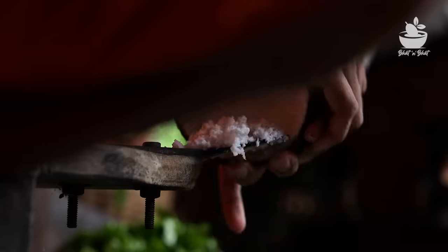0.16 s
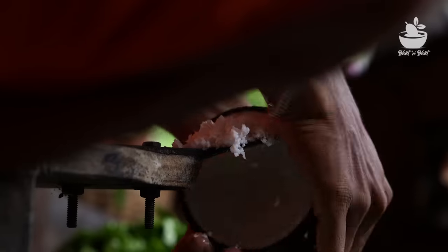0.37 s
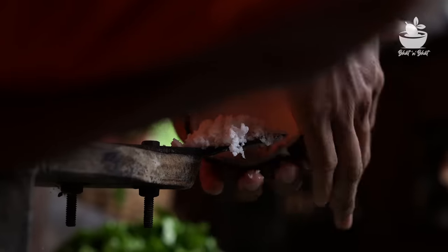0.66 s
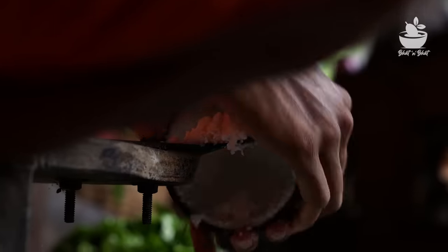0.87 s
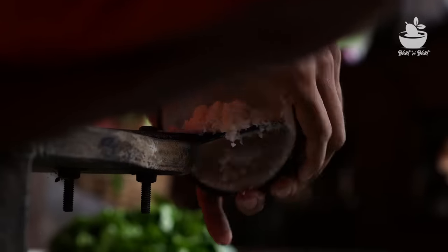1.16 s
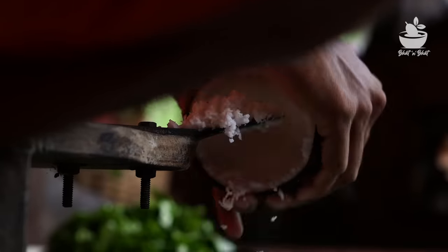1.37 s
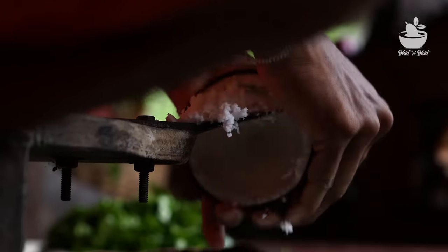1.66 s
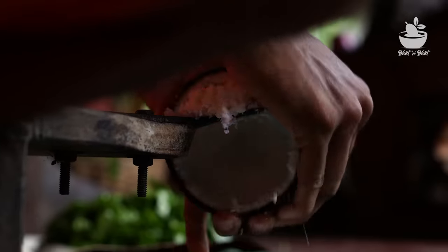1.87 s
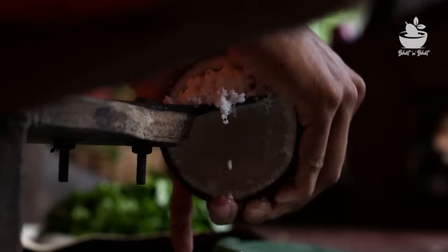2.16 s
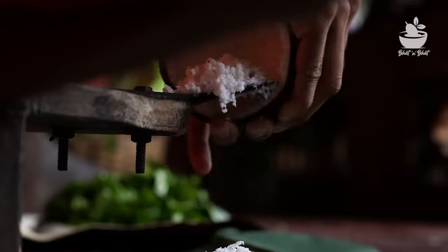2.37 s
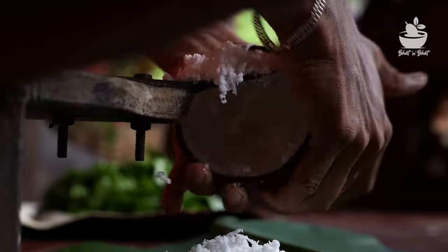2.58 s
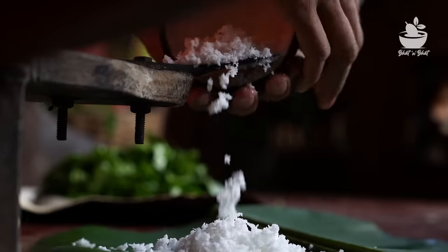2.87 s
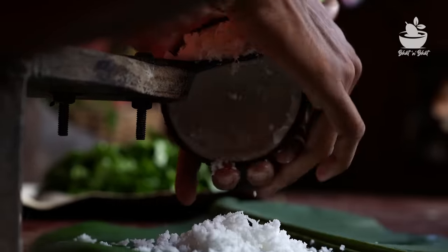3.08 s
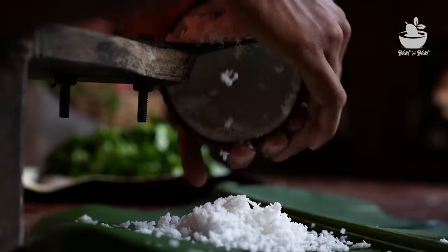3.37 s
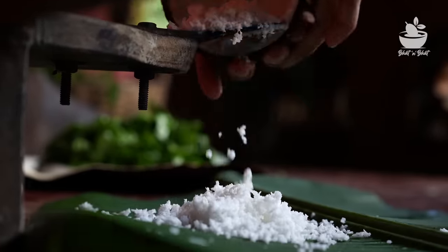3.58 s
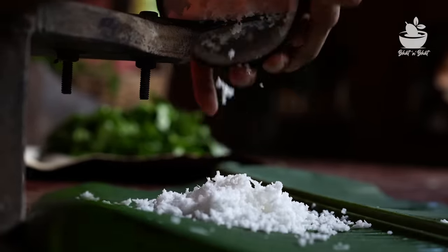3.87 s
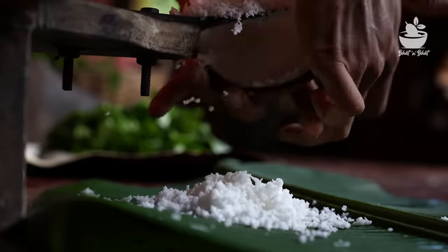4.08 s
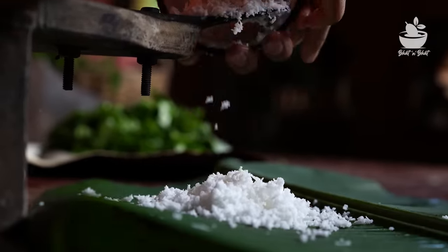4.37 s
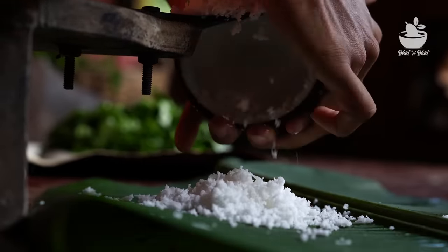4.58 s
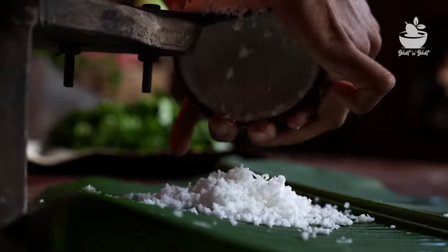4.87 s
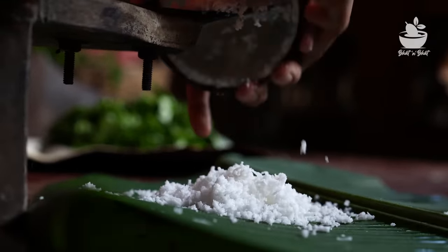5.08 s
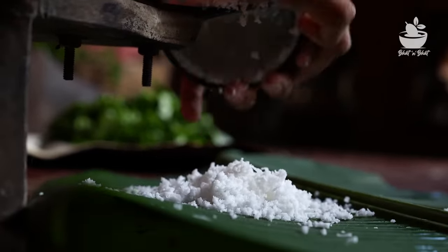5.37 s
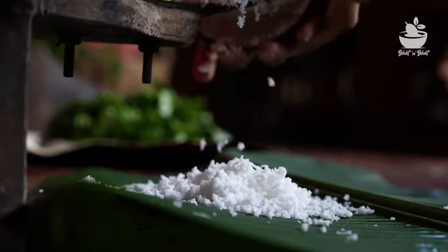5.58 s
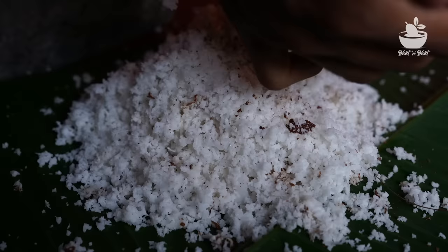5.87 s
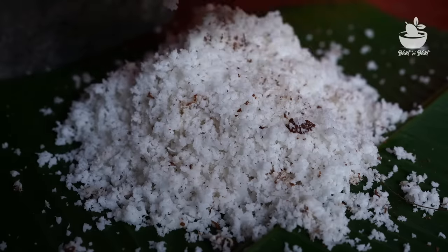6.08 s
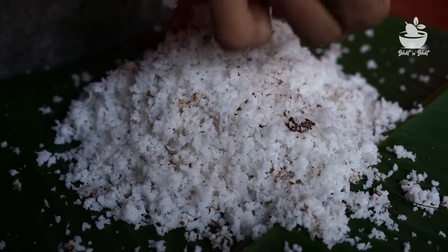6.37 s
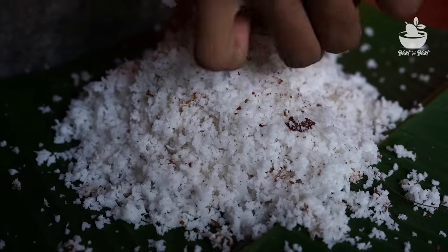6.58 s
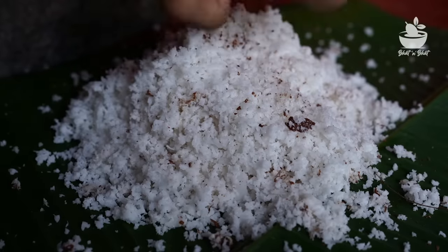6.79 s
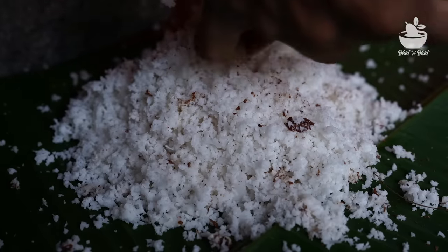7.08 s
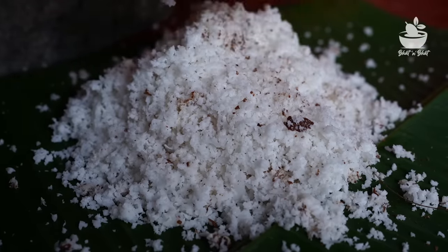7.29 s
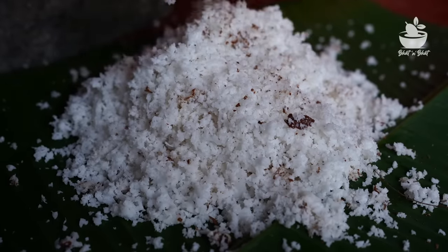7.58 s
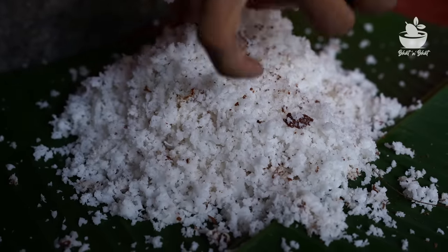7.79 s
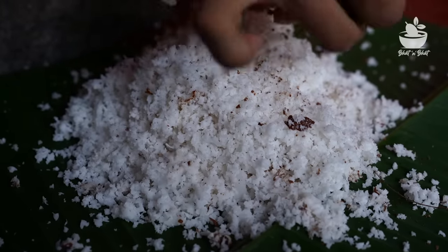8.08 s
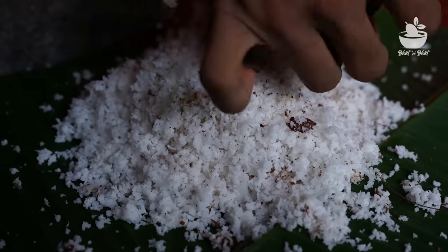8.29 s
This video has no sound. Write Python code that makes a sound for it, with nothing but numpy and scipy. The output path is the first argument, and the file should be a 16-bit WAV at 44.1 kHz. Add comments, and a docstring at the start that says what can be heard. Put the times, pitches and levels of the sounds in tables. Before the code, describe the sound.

A close, dry-sounding kitchen scene with a short room tail, faint hiss, gently swelling rumble, a low drone and a barely audible high whine. From 0 s a halved coconut is scraped over a toothed metal blade, roughly three strokes a second, each about a tenth of a second long: a hollow low boom, a dull blade ring and a grainy fibrous rasp. Small thumps and clacks fall between strokes as the shell is set back, strongest near 0.5 s and 3.9 s. Short pauses come around 0.6, 2.8 and 4.2 s, the latter two with very faint rubbing. A brief blade judder sounds at 4.5 s. From 5.9 s the drone fades and the scraping turns thinner, crisper and more metallic, with stuttering judders, clearest at 6.2 and 6.8 s. A light wooden tock comes at 7.1 s, then four more strokes and a firmer knock near 8.2 s before the end at 8.4 s.

```python
"""A coconut half is pushed over the toothed blade of a bench scraper, about three strokes a second, heard close by.
Stick and slip at the teeth excites three bodies: the hollow shell booms, the blade rings and the torn fibres rasp.
Between strokes the shell is set back on the blade with a small knock; the blade judders at times, and one wooden
tock sounds. From 5.9 s the scraping sounds thinner and crisper. Behind it lie a short room tail, faint hiss and
rumble, a low drone and a thin whine."""
import sys
import numpy as np
from scipy import signal
from scipy.fft import rfft, irfft, next_fast_len
from scipy.io import wavfile
from scipy.ndimage import uniform_filter1d, minimum_filter1d, map_coordinates

SR = 44100
rng = np.random.default_rng(int(sys.argv[2]) if len(sys.argv) > 2 else 0)


def log_audio(samples):
    """Write samples as a 16-bit WAV file to the path given in sys.argv[1]."""
    # one column per channel
    frames = np.atleast_2d(samples).T
    # limit to full scale, then quantise
    limited = np.clip(frames, -1, 1)
    pcm = np.round(limited * 32767).astype(np.int16)
    wavfile.write(sys.argv[1], SR, pcm)


N = 371971  # length [samples]

# Spectrum of the quiet kitchen, relative: (frequency [Hz], density [dB per Hz])
QUIET = [(20, 0.5), (45, -8.5), (70, -7.5), (150, -14), (220, -8), (400, -10.5), (720, -19.5), (1000, -24),
         (1400, -29), (2400, -34.5), (3000, -37), (5000, -40.5), (7000, -45), (15800, -52)]
QUIET_DB = -42  # rms level before the swell and the hush
# Gain of the background above the deepest rumble: (time [s], gain [dB])
HUSH = [(0, -0.5), (5.88, 0), (5.93, -3), (6.1, 0.5), (6.3, 0), (8.43, 0.5)]
HUSH_ABOVE_HZ = 45  # corner below which the hush fades out
# Faint steady notes: (time [s], drone near 105 Hz [dB], mean whine near 10 kHz [dB])
HUMS = [(0, -49, -86), (5.8, -50.5, -82), (5.95, -64, -75), (8.43, -74, -77)]
# Decay of the room: (frequency [Hz], time to fall 60 dB [s])
ROOM_DECAY = [(150, 1), (370, 0.5), (800, 0.39), (2500, 0.35), (12000, 0.2)]
ROOM_DB = (-22.5, -18)  # room against direct sound, in the fuller and the thinner timbre

# The teeth slip in step with the blade's low note:
# (time [s], level before the shared gain [dB], nominal frequency [Hz])
JUDDERS = [(4.486, -10.5, 663), (5.697, -16, 595), (6.223, -2.5, 614), (6.548, -9.5, 661), (6.823, -6, 636),
           (7.663, -14, 670), (7.957, -19, 659)]
JUDDER_DB, JUDDER_S = -6.5, 0.013  # shared gain; time from the middle to 1/e

# The shell meets the blade between strokes; levels precede the gains in knocks():
# (time [s], thump [dB], clack [dB], crunch [dB])
TAPS = [(0.207, -14.5, -36, -44), (0.546, -7, -20.5, -39.5), (0.723, -21, -37, -50),
        (1.124, -21, -35, -41.5), (1.463, -19.5, -35, -47), (1.779, -20, -30.5, -44.5),
        (2.103, -20, -38, -52), (2.395, -18, -31, -43.5), (2.703, -14.5, -29.5, -39),
        (3.207, -44, -50, -48), (3.289, -20, -33, -43), (3.601, -23.5, -41, -53), (3.866, -10, -24, -36.5),
        (4.143, -36, -46, -43), (4.745, -25, -34.5, -46), (5.032, -22.5, -28.5, -40),
        (5.328, -16.5, -31, -42), (5.596, -29, -44, -43), (5.89, -22, -36, -46.5), (6.076, -34, -52, -60),
        (6.128, -25.5, -26.5, -41.5), (6.446, -25.5, -31.5, -42), (6.731, -24, -30, -36),
        (7.258, -34, -39, -47), (7.605, -23.5, -31, -41.5), (7.895, -27, -37, -43),
        (8.166, -15, -19.5, -42)]
CONTACT_S, CONTACT_HALVES_DB = 0.00047, 13  # contact at a 0 dB thump; this much harder halves it
# Spectrum of crushed flakes, relative: (frequency [Hz], density [dB per Hz])
FLAKES = [(1000, -14), (1700, 0), (2500, 0.5), (3600, -21), (4500, -2), (5200, 0), (6200, -21), (8500, -9),
          (16000, -32)]

# One row a stroke; peaks precede the gains of PUSH, BITE and RASP, the sag precedes their shares:
# (start [s], length [s], attack [s], push on the shell [dB], bite of the blade [dB],
#  rasp of the fibres [dB], sag by the end [dB])
STROKES = [(-0.059, 0.1, 0.008, -9, -21, -35, 12), (0.226, 0.12, 0.045, -14, -25.5, -39, 3),
           (0.825, 0.14, 0.016, -15.5, -28.5, -41.5, 2.5), (1.155, 0.13, 0.024, -12.5, -27, -40, 3),
           (1.481, 0.14, 0.021, -14.5, -27, -40.5, 6), (1.802, 0.13, 0.025, -14, -25.5, -40.5, 3.5),
           (2.124, 0.12, 0.029, -14, -25.3, -38.5, 7.5), (2.417, 0.11, 0.032, -13.5, -25, -38, 6.5),
           (2.972, 0.14, 0.045, -14, -24, -38, 8), (3.315, 0.11, 0.036, -16.5, -27, -39, 1),
           (3.618, 0.1, 0.033, -10.5, -25.3, -36, 9.5), (3.901, 0.099, 0.019, -13.0, -23.5, -35.5, 7.5),
           (4.44, 0.17, 0.022, -13.0, -25.5, -38.5, 20.5), (4.759, 0.12, 0.027, -14.5, -25.5, -38, 8.5),
           (5.063, 0.08, 0.029, -16.5, -25, -36.5, -3.5), (5.358, 0.095, 0.019, -17, -27, -37.5, 0.0),
           (5.634, 0.11, 0.054, -10, -24.5, -36.5, 11), (6.178, 0.12, 0.056, -10, -16.5, -36, 12),
           (6.482, 0.069, 0.037, -16.5, -23.5, -40, -1.5), (6.786, 0.092, 0.01, -19.5, -22, -40.5, 2.5),
           (7.324, 0.11, 0.046, -16, -22, -37.0, 2), (7.634, 0.08, 0.033, -19.5, -21, -35.5, -1),
           (7.918, 0.1, 0.022, -20, -23.5, -35, 5.5), (8.198, 0.097, 0.011, -12, -16, -33.5, 15.5)]
# How each force follows a stroke: (gain [dB], power of the rise, share of the sag, release [dB per s])
PUSH, BITE, RASP = (2.95, 0.98, 1.08, 305), (1.17, 0.88, 0.85, 340), (0.82, 0.87, 0.68, 290)
SAG_POWER = 1.56  # over 1: pressure changes slowly at first, then faster
GRAB = (0.14, 0.082, 0)  # share of the attack before push, bite and rasp set in: fibres graze first
# The teeth dig in (+) or skid (-) for a moment:
# (time [s], extra push [dB], extra bite [dB], extra rasp [dB])
SNAGS = [(.331, -1.5, 6.5, 4), (.878, 4.5, 0, 2.5), (1.176, 2.5, -2, 1.5), (1.836, 5, -0.5, -0.5),
         (1.912, -7, 3, 1), (2.997, 4, -5, 1), (3.049, 2, 2, -1), (3.354, 4.5, 4, -3), (4.487, 3, 4, -3),
         (4.783, 3, 2.5, -6), (5.156, 2, 4, 5.5), (5.416, 0, 5, 6.5), (5.7, -2.5, 6, 8), (6.268, 3, 4, 2),
         (6.506, -4, 9, 4), (6.55, 1.5, 7.5, 4), (6.81, -3, 9, 5), (6.85, -3, -3, -5), (6.878, 4, 2, 0),
         (7.367, 5, 10, 2.5), (7.663, -3, 11.5, 7.5), (7.955, 8, 12.5, 4.5)]
SNAG_S = 0.0079  # time from the middle of a snag to 1/e of its extra dB
# Fingers and shell rub lightly on the blade while the hand pauses:
# (middle [s], time from the middle to 1/e [s], level [dB])
RUBS = [(2.85, 0.19, -66), (4.388, .05, -60)]

THINNER_S = 5.92  # the thinner timbre begins; the next four tables hold a list for the fuller, then the thinner
# Resonances of the hollow shell: (frequency [Hz], width [Hz], relative level [dB])
SHELL = [
    [(248.6, 46.6, -4), (367.2, 42.7, 2.5), (470, 72, -3.5)],
    [(217, 25, -11), (352.6, 38, -0.5), (397.5, 19.5, 1), (520, 90, -42)],
]
# Resonances of the blade: (frequency [Hz], width [Hz], relative level [dB])
BLADE = [
    [(589, 85, 0.5), (658, 74, -2.5), (886, 130, -10), (974, 69, -5), (1155, 90, -12.5), (1309, 68, -8),
     (1560, 32, -10.5)],
    [(649, 44, 5.5), (698, 68, 1), (800, 110, -9), (882, 104, -7), (1154, 76, -9), (1260, 200, -13.5),
     (1427, 88, -10.5)],
]
# Lifts and notches that the steel makes in the treble: (frequency [Hz], width [Hz], gain [dB])
STEEL = [
    [(1730, 220, -7), (2096, 410, 9), (2382, 97, 7), (2720, 150, -3.5), (2960, 52, 8.5), (3240, 98, -2.5),
     (3324, 99, 7), (4120, 230, 4), (5180, 200, 2)],
    [(1710, 114, -9), (2053, 290, 10.5), (2290, 135, 6), (2560, 130, 3.5), (2870, 400, 5.5),
     (3320, 54, 1.5), (4400, 230, 2.5), (5300, 170, 7), (8100, 350, 0)],
]
# Spectrum of tearing fibres, relative: (frequency [Hz], density [dB per Hz])
FIBRES = [
    [(900, -3), (1600, -11.5), (2400, -0.5), (3300, -6.5), (5500, -11), (7000, -19.5), (10000, -20),
     (13000, -29.5), (16000, -25)],
    [(900, -23), (1600, -3.5), (2400, -3), (3500, -6), (5500, -10), (7000, -15), (8500, -13.5),
     (12000, -20.5), (16000, -27)],
]
# Lift of the finest crackle: (time [s], gain [dB])
CRISP = [(0, 1.5), (1.6, 2), (3.2, 3), (5.7, 2), (6.2, 4), (8.3, 1)]

TOP_HZ = 15830  # band limit


def amp(db):
    """Level: amplitude grows tenfold every 20 dB."""
    return 10 ** (np.asarray(db) / 20)


def unit(x):
    """Normalisation: the rms becomes 1."""
    return x / np.sqrt(np.mean(np.abs(x) ** 2) + 1e-20)


def along(points, hz):
    """Interpolation on a logarithmic frequency axis through (frequency [Hz], value) points."""
    frequency, value = np.transpose(points)
    return np.interp(np.log(hz + 1), np.log(frequency + 1), value)


def over_time(points):
    """Linear interpolation through (time [s], value) points, one value a sample."""
    return np.interp(np.arange(N) / SR, *np.transpose(points))


def wobble(rate):
    """Slow fluctuation: a smooth curve through random knots, rate of them a second."""
    knots = rng.standard_normal(int(N * rate / SR) + 4)
    return map_coordinates(knots, [np.arange(N) * rate / SR])


def filtered(x, response):
    """Linear filtering: the spectrum is multiplied by a response of frequency."""
    size = 2 * next_fast_len(N // 2 + SR // 4)
    return irfft(rfft(x, size) * response(np.fft.rfftfreq(size, 1 / SR)), size)[:N]


def causal(gain):
    """Minimum phase: folding the cepstrum gives the response with this gain that rings only after a blow."""
    cepstrum = irfft(np.log(np.maximum(gain, 1e-6)))
    half = len(cepstrum) // 2
    cepstrum[1:half] *= 2
    cepstrum[half + 1:] = 0
    return np.exp(rfft(cepstrum))


def bell(hz, centre, width):
    """Resonance: the power curve of one damped mode."""
    return 1 / (1 + ((hz ** 2 - centre ** 2) / (hz * width + 1e-9)) ** 2)


def air(swell_db=2.0):
    """Broadband background: hiss over a rumble that swells and sinks, with two narrow bands of noise as hums."""
    def noise(gain):
        return unit(filtered(rng.standard_normal(N), gain))

    floor = noise(lambda hz: amp(along(QUIET, hz)))
    rumble = filtered(floor, lambda hz: 1 / (1 + (hz / 500) ** 4))
    swell = unit(amp(swell_db * wobble(9.9)))
    floor = floor + rumble * (swell - 1)
    upper = filtered(floor, lambda hz: 1 / (1 + (HUSH_ABOVE_HZ / (hz + 1)) ** 2))
    floor = floor + upper * (amp(over_time(HUSH)) - 1)

    s, drone_db, whine_db = np.transpose(HUMS)
    drone_db = over_time(np.column_stack([s, drone_db]))
    whine_db = over_time(np.column_stack([s, whine_db])) + 2 * wobble(3.4)
    drone = amp(drone_db) * noise(lambda hz: bell(hz, 106, 41))
    whine = amp(whine_db) * noise(lambda hz: bell(hz, 9850, 300))
    return amp(QUIET_DB) * floor + drone + whine


def room(x):
    """Reverberation: convolution with decaying noise whose low notes linger longest."""
    hz, t, z = signal.stft(rng.standard_normal(SR), SR, nperseg=256)
    decay = amp(-60 * t / along(ROOM_DECAY, hz)[:, None])
    tail = signal.istft(z * decay, SR, nperseg=256)[1]
    tail *= 1 - np.exp(-np.arange(len(tail)) / SR / 0.012)  # soft onset
    return signal.fftconvolve(x, tail / np.linalg.norm(tail))[:N]


def tock(start=7.103, hz=960, db=-22, t60=0.028, attack=0.0014):
    """Damped oscillation: one short, light wooden note with a soft attack; times in s."""
    t = np.maximum(np.arange(N) / SR - start, 0)
    envelope = amp(db - 60 * t / t60) * (1 - np.exp(-t / attack))
    return envelope * np.sin(2 * np.pi * hz * t)


def judders(waver=0.0403):
    """Self-sustained stick and slip: short, wavering notes of the blade that swell and die."""
    t, out = np.arange(N) / SR, np.zeros(N)
    clock = np.cumsum(1 + waver * wobble(150)) / SR  # uneven time bends the pitch
    for s, db, hz in JUDDERS:
        near = np.abs(t - s) < 3 * JUDDER_S
        envelope = amp(db + JUDDER_DB) * np.exp(-((t[near] - s) / JUDDER_S) ** 2)
        out[near] += envelope * np.sin(2 * np.pi * hz * clock[near])
    return out


def knocks(rebound_time=0.00514, rebound=0.25, soft_time=0.0035):
    """Impact: a blow with a slight rebound; a gentler one lasts longer and crushes more loose flakes."""
    force, t = np.zeros((4, N + SR)), np.arange(SR // 20) / SR
    blow = np.zeros(len(t))
    blow[0] = 1
    blow[round(rebound_time * SR)] = rebound
    for s, thump_db, clack_db, crunch_db in TAPS:
        contact = CONTACT_S * 2 ** (-thump_db / CONTACT_HALVES_DB)
        envelope = (1 - np.exp(-3 * t / contact)) * np.exp(-t / (contact + 0.0048))
        crush = rng.standard_normal(len(t)) * envelope
        crush /= np.linalg.norm(crush)
        crunch = amp(crunch_db) * crush
        soft = np.clip(contact / soft_time, 0, 1)
        thump = amp(thump_db) * blow
        clack = amp(clack_db) * (0.57 * blow + 0.5 * crush)
        crack = np.sqrt(1 - soft ** 2) * crunch  # shares the power with the flakes
        at = round(s * SR)
        force[:, at:at + len(t)] += [thump, clack, crack, soft * crunch]
    gains_db = [[19.5], [22], [18], [18]]  # thump, clack, crack, flakes
    return amp(gains_db) * force[:, :N]


def flakes(crunch):
    """Spectral colouring: the crushing force takes on the spectrum of loose flakes."""
    return filtered(crunch, lambda hz: unit(causal(amp(along(FLAKES, hz)))))


def pressure_db(since, length, attack, rise_power, sag_db, release_db_per_s):
    """Contact pressure: the nut is pressed on, the pressure drifts by the sag over the teeth, then it lifts off."""
    rise = np.clip(since / max(attack, 0.002), 1e-6, 1)
    way = np.clip(since / length, 0, 1)
    release_db = release_db_per_s * np.maximum(since - length, 0)
    return 20 * np.log10(rise ** rise_power) - sag_db * way ** SAG_POWER - release_db


def efforts():
    """Driving force: push, bite and rasp share one stroke shape, snags alter it, and light rubs only rasp."""
    t, level = np.arange(N) / SR, np.zeros((3, N))
    for start, length, attack, *peaks_db, sag_db in STROKES:
        near = (t > start) & (t < start + 3 * length)
        for force, db, grab, follow in zip(level, peaks_db, GRAB, (PUSH, BITE, RASP)):
            gain_db, rise_power, share, release = follow
            wait = grab * attack
            since = t[near] - start - wait
            shape_db = pressure_db(since, length - wait, attack - wait, rise_power, share * sag_db, release)
            force[near] += amp(db + gain_db + shape_db)
    for s, *extra_db in SNAGS:
        near = np.abs(t - s) < 3 * SNAG_S
        level[:, near] *= amp(np.outer(extra_db, np.exp(-((t[near] - s) / SNAG_S) ** 2)))
    for s, half, db in RUBS:
        level[2] += amp(db) * np.exp(-((t - s) / half) ** 2)
    return level


def catches(rate, scatter, size_db):
    """Stick and slip: an uneven train of small jerks, rate of them a second on average, rms 1."""
    gaps = np.exp(scatter * rng.standard_normal(N // 4))
    at = (np.cumsum(gaps / gaps.mean()) * SR / rate).astype(int)
    sizes = amp(size_db * rng.standard_normal(len(at)))
    train = np.bincount(at[at < N], sizes[at < N], N)
    return unit(train - train.mean())


def shifting(x, depth_db, bins, frames):
    """Moving excitation: the contact point wanders over the shell, so patches of the spectrum swell and fade."""
    z = signal.stft(x, nperseg=256)[2]
    field = rng.standard_normal(z.shape)
    for _ in range(2):
        field = uniform_filter1d(field, bins, axis=0)
        field = uniform_filter1d(field, frames, axis=1)
    return signal.istft(z * unit(amp(depth_db * unit(field))), nperseg=256)[1][:N]


def strokes():
    """Stick and slip: each catch of a tooth jerks shell and blade and ends in a spray of snapping fibres."""
    teeth = catches(rate=420, scatter=0.6, size_db=3.5)
    chips = catches(rate=1500, scatter=0.9, size_db=3.5)
    cells = catches(rate=1100, scatter=1, size_db=1.0)
    spray_decay = np.exp(-1 / (0.0034 * SR))  # 3.4 ms to 1/e
    spray = np.abs(signal.lfilter([1], [1, -spray_decay], np.maximum(teeth, 0)))
    snaps = unit((unit(spray) + 0.41) * rng.standard_normal(N) + 0.41 * cells)
    snaps = shifting(snaps, depth_db=2.2, bins=3, frames=5)
    return efforts() * np.array([teeth, unit(teeth + 1.62 * chips), snaps])


def body(x, modes, low_hz, high_hz):
    """Modal resonance: x rings through modes that radiate between two edges; white input keeps its power."""
    def response(hz):
        power = sum(amp(db) ** 2 * bell(hz, centre, width) for centre, width, db in modes)
        edges = (1 + (low_hz / (hz + 1)) ** 6) * (1 + (hz / high_hz) ** 6)
        return unit(causal(np.sqrt(power / edges)))
    return filtered(x, response)


def torn(x, fibres, steel):
    """Fracture noise: the colour of tearing flesh, lifted or notched at the steel's high modes."""
    def response(hz):
        lift_db = sum(db * bell(hz, centre, width) for centre, width, db in steel)
        return unit(causal(amp(along(fibres, hz) + lift_db)))
    return filtered(x, response)


def coconut(push, bite, rasp):
    """Forced vibration: three forces sound through the hollow shell, the blade on its board and the flesh."""
    t = np.arange(N) / SR
    boom, ring, tear = np.zeros((3, N))
    timbres = (t < THINNER_S, t >= THINNER_S)
    for active, shell, blade, fibres, steel in zip(timbres, SHELL, BLADE, FIBRES, STEEL):
        boom += body(active * push, shell, low_hz=168.6, high_hz=640)
        ring += body(active * bite, blade, low_hz=540, high_hz=1550)
        tear += torn(active * rasp, fibres, steel)
    crackle = filtered(tear, lambda hz: 1 / (1 + (5500 / (hz + 1)) ** 4))
    return boom + ring + tear + (amp(over_time(CRISP)) - 1) * crackle


def scene():
    """Superposition: scraping, its room tail and the background add up, alike in both channels."""
    push, bite, rasp = strokes()
    thump, clack, crack, crunch = knocks()
    grating = coconut(push + thump, bite + clack, rasp + crack)
    direct = grating + flakes(crunch) + judders() + tock()
    wet = amp(np.where(np.arange(N) / SR < THINNER_S, *ROOM_DB))
    mono = direct + room(wet * direct) + air()
    return np.array([mono, mono])


def limiter(x, ceiling):
    """Peak limiting: the gain falls for a few milliseconds around each peak above the ceiling."""
    needed = np.minimum(1, ceiling / (np.abs(x) + 1e-9))
    return x * uniform_filter1d(minimum_filter1d(needed, size=260), size=200)


def record(dry):
    """Limiting in level, then in band: peaks are held down and all above the top frequency is removed."""
    held = [limiter(x, ceiling=0.57) for x in dry]
    return np.array([filtered(x, lambda hz: hz < TOP_HZ) for x in held])


dry = scene()
out = record(dry)
log_audio(out)
```